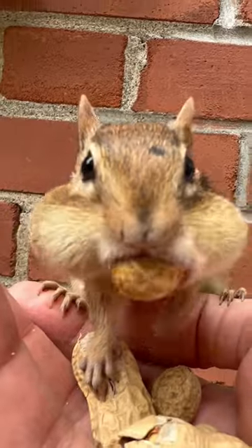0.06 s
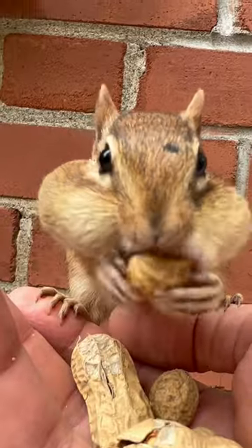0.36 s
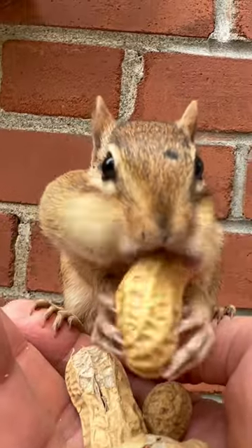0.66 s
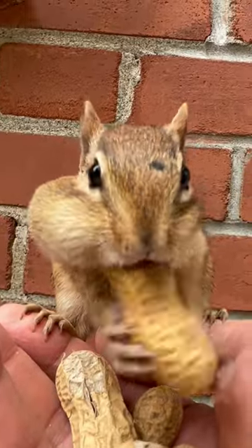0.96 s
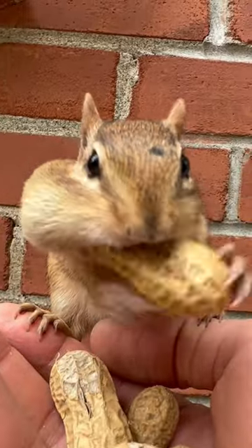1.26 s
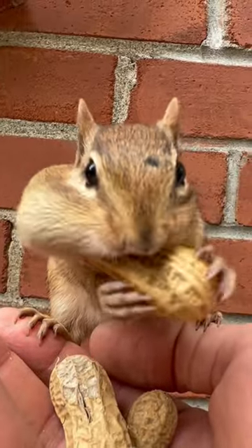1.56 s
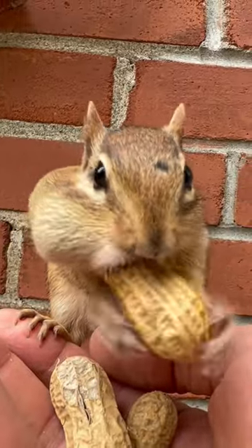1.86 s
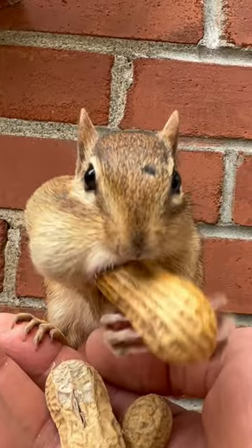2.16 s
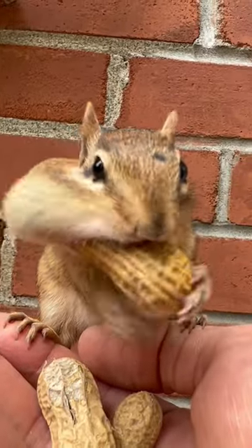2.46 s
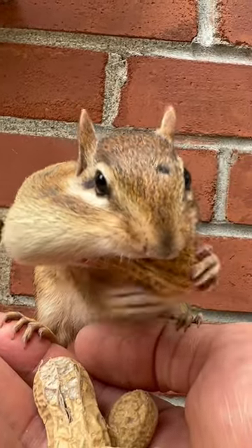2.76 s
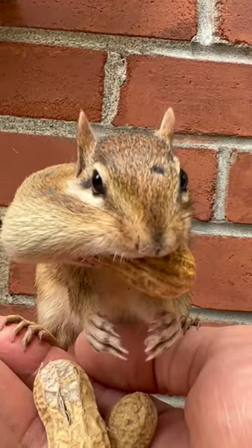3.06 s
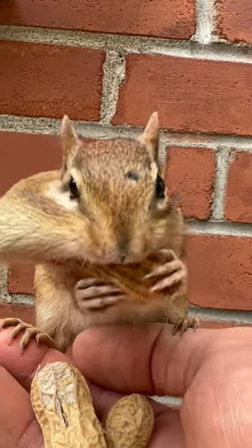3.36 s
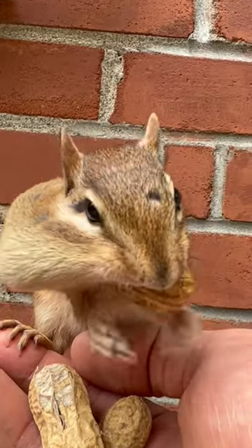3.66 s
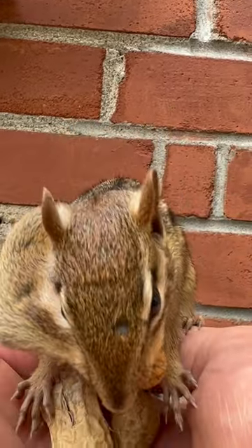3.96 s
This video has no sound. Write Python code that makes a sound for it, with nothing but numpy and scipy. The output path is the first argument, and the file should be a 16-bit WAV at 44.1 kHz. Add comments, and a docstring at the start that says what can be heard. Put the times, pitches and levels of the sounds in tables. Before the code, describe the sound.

A peanut shell ticks, crackles and scrapes softly up close in a chipmunk's teeth and paws, busy until about 2.7 seconds, then sparser. Soft bumps come near 1 and 1.7 seconds, and a hollow tap at 3.9. A bird's short, high chirps ring out louder at the start, 1.2 and 3 seconds, with fainter ones far off. Faint distant traffic and a low outdoor rumble continue underneath.

```python
"""A chipmunk on an open hand turns a peanut and works it into its cheek, close up, before a brick wall.
Teeth and claws tick on the dry hollow shell, paws and fur scrape over it in quick strokes, and the
nut or a paw bumps softly on the hand. A bird's three short high chips ring around the yard (the
first just before the start), with fainter ones far off. Under it all lie a wash of distant traffic
and a low outdoor rumble."""
import sys
import numpy as np
from scipy import signal
from scipy.fft import rfft, irfft
from scipy.io import wavfile

SR = 44100
rng = np.random.default_rng(int(sys.argv[2]) if len(sys.argv) > 2 else 0)


def bounce(signal):
    """Save signal as a 16-bit WAV file at the path given by the first command-line argument."""
    frames = np.transpose(np.atleast_2d(signal))
    limited = np.clip(frames, -1, 1)
    pcm = np.round(limited * 32767).astype(np.int16)
    wavfile.write(sys.argv[1], SR, pcm)


N = 176400
TIME = np.arange(N) / SR

# The nut has four layers, low to high: hollow body, crunch, dry crack, top fizz.
# Tooth and claw ticks, before trim: start_s, crumble_s, pitch_hz, body_db, crunch_db, crack_db, fizz_db
SHELL_TICKS = [(0.0137, 0.0038, 1865, -56, -66, -79.5, -65),
               (0.0431, 0.0026, 2180, -68.5, -75.5, -60.5, -72.5),
               (0.061, 0.00113, 2390, -59.5, -65.5, -65.5, -72),
               (0.084, 0.00214, 2370, -56.5, -55.5, -48, -53.5),
               (0.3105, 0.00185, 2050, -60, -71, -74.5, -91.5),
               (0.4586, 0.0018, 1510, -79, -80, -73, -69.5),
               (0.4806, 0.00117, 1680, -73.5, -68, -65, -83.5),
               (0.5109, 0.00061, 1510, -67.5, -79, -69.5, -82.5),
               (0.6095, 0.00027, 1510, -87, -95.5, -64, -85.5),
               (0.633, 0.00255, 1460, -61, -71.5, -63, -73.5),
               (0.6793, 0.00053, 2260, -74, -66.5, -56.5, -68.5),
               (0.6836, 0.00098, 1740, -87, -80, -59, -58.5),
               (0.7231, 0.0035, 1420, -59.5, -81, -65.5, -74.5),
               (0.7369, 0.0028, 3100, -71.5, -65, -81, -78),
               (0.7845, 0.0013, 1580, -83.5, -83.5, -77.5, -67),
               (0.8558, 0.0021, 1940, -72, -72, -68.5, -59.5), (0.8588, 0.0051, 2140, -58.5, -88, -60, -76),
               (0.9417, 0.0024, 1510, -60, -76, -73.5, -83), (0.9536, 0.0037, 1706, -56.5, -73, -78, -77.5),
               (1.0151, 0.0007, 2080, -63, -89.5, -56.5, -77),
               (1.0177, 0.00305, 1623, -51, -67.5, -64, -70),
               (1.0344, 0.0057, 1860, -58.5, -75, -68.5, -70.5),
               (1.1015, 0.0026, 1850, -77, -69.5, -62.5, -70), (1.2308, 0.0037, 2100, -58, -66.5, -75, -75),
               (1.3146, 0.00099, 1510, -60, -72.5, -54, -62),
               (1.3197, 0.0025, 1580, -58, -79, -51.5, -51.5),
               (1.3264, 0.00047, 1640, -66.5, -78, -49.5, -62), (1.359, 0.004, 2310, -72.5, -78, -52, -59),
               (1.368, 0.00204, 1740, -65, -66, -56, -62.5),
               (1.4503, 0.0052, 1800, -81.5, -80.5, -57, -62.5),
               (1.4674, 0.00224, 1550, -63, -74.5, -57, -73),
               (1.4883, 0.00073, 1510, -77.5, -77.5, -64, -71.5),
               (1.5362, 0.00108, 1510, -84.5, -78, -53.5, -67),
               (1.5611, 0.00314, 1510, -78.5, -75.5, -57, -64),
               (1.6044, 0.00075, 1570, -59, -64, -53, -58.5), (1.6578, 0.0091, 1910, -68, -73, -57, -64.5),
               (1.6967, 0.0026, 1490, -60.5, -53, -57, -66.5),
               (1.7001, 0.0042, 1640, -58.5, -67, -62.5, -73), (1.7522, 0.0069, 1560, -60, -69, -69.5, -71),
               (1.8088, 0.0033, 1790, -69.5, -76.5, -61, -73.5),
               (1.8741, 0.0009, 2170, -63.5, -62, -55.5, -78), (1.9106, 0.0007, 1680, -64, -70, -53.5, -68),
               (1.9515, 0.0051, 2240, -79, -75, -67, -75.5), (2.0137, 0.0038, 1530, -62, -72.5, -88, -79),
               (2.212, 0.0067, 1730, -58, -63.5, -66.5, -75), (2.2328, 0.00104, 1510, -73.5, -73, -56, -77),
               (2.3003, 0.0026, 1680, -81.5, -83.5, -69, -68.5), (2.3105, 0.0102, 1590, -64, -80, -61, -67),
               (2.3703, 0.00073, 1960, -89, -77.5, -61, -62.5),
               (2.391, 0.0043, 1510, -79.5, -73, -62.5, -65),
               (2.4358, 0.0027, 1800, -61, -71.5, -79, -83.5),
               (2.6147, 0.0036, 1885, -60, -83.5, -76.5, -84.5),
               (2.715, 0.0044, 2250, -70, -67, -55.5, -64), (2.7225, 0.00116, 2070, -61, -66, -54.5, -69.5),
               (2.8834, 0.005, 1510, -62, -92, -89, -108),
               (3.2767, 0.0029, 1870, -63.5, -72.5, -76.5, -85.5),
               (3.4121, 0.0053, 1520, -68.5, -65.5, -61.5, -69.5),
               (3.4859, 0.0053, 1670, -63.5, -83, -78, -76.5),
               (3.5045, 0.0021, 2376, -54, -58, -45.5, -56.5)]
TICK_TRIM_DB = (0.85, 0.39, 1.255, 0.5)   # per layer
SNAP_SHARE, CRUMBLE_GRAINS_PER_S = 0.456, 8600   # snap's share of the force energy; fibres breaking after
# Scraping strokes, before trim: start_s, length_s, body_db, crunch_db, crack_db, fizz_db
STROKES = [(0, 0.1065, -66, -65.5, -65.5, -71), (0.162, 0.13, -69, -84, -72.5, -81.5),
           (0.297, 0.084, -70.5, -97, -75, -81.5), (0.379, 0.1745, -68.5, -78.5, -67.5, -80.5),
           (0.553, 0.0103, -65, -74, -70.5, -85), (0.595, 0.129, -71.5, -82.5, -70.5, -81),
           (0.679, 0.086, -73, -73.5, -67, -79), (0.772, 0.05, -66, -84, -68.5, -81),
           (0.831, 0.0355, -69.5, -76.5, -68.5, -86), (0.942, 0.0614, -66.5, -71, -64, -81.5),
           (0.999, 0.0707, -76.5, -79.5, -63.5, -81.5), (1.09, 0.116, -66, -75, -63, -76.5),
           (1.196, 0.0736, -68, -71.5, -64, -72.5), (1.301, 0.034, -61.5, -70, -62.5, -70.5),
           (1.351, 0.0334, -66, -74, -58.5, -69.5), (1.389, 0.0415, -80.5, -92, -73, -82.5),
           (1.447, 0.048, -73.5, -77, -64.5, -75), (1.553, 0.011, -76, -85.5, -73.5, -76),
           (1.588, 0.0243, -63.5, -70, -61.5, -73), (1.654, 0.0728, -63.5, -68.5, -69.5, -78.5),
           (1.746, 0.042, -65.5, -70.5, -67.5, -81.5), (1.792, 0.0334, -81, -70, -61, -72.5),
           (1.859, 0.047, -67.5, -72, -67.5, -82.5), (1.938, 0.0413, -73.5, -88, -69.5, -75.5),
           (1.999, 0.085, -76.5, -96, -68, -80.5), (2.143, 0.1032, -69, -74.5, -68, -72.5),
           (2.264, 0.093, -74.5, -79.5, -77.5, -81.5), (2.36, 0.0306, -85.5, -76.5, -70.5, -72.5),
           (2.419, 0.0404, -68.5, -76, -65.5, -80), (2.548, 0.118, -77, -80, -84, -90),
           (2.66, 0.0763, -69, -80, -70, -77.5), (2.712, 0.0436, -79.5, -75.5, -78.5, -83),
           (3.178, 0.0305, -72.5, -71, -72.5, -79.5), (3.271, 0.054, -72.5, -83, -79.5, -90.5),
           (3.399, 0.044, -67, -79.5, -73, -80), (3.46, 0.077, -71, -72.5, -67, -76.5),
           (3.819, 0.1047, -70, -79.5, -74.5, -93.5)]
STROKE_TRIM_DB = (-0.7, 0.15, -.5, 0)   # per layer
RUSTLE_DB, TURNING_ENDS_S = (-82, -85.5, -83, -97.5), 2.46   # per layer, while the nut is turned
STROKE_EDGE_S, STROKE_SWELL, SCRAPE_PITCH_HZ = .013, 0.524, 1998
SCRAPE_GRAINS_PER_S, STICK_SLIP_DB = 2800, 4
# Dull thumps of the nut or a paw on the hand: start_s, peak_db, pitch_hz
THUMPS = [(1.018, -46, 549), (1.019, -54.5, 250), (1.696, -45, 135.3), (1.701, -49, 292.6),
          (1.755, -44, 197.4), (1.822, -48.5, 110), (3.883, -46.5, 336.8)]
# Modes of the whole nut's hollow tock: pitch_hz, width_hz, gain_db
TOCK_MODES = [(2093, 378, -1), (2588, 205, 4), (4036, 550, -15.5), (9180, 1610, -21)]
TOCK_S, TOCK_PEAK_DB, THUMP_Q = 3.8826, -32.5, 5.85
# Modes of the hollow shell: pitch_ratio, width_hz, gain_db
SHELL_MODES = [(.55, 447.9, 1.5), (1.0, 427.4, 10.5), (1.3, 520, -2.5)]
# Mid crunch of breaking fibres: frequency_hz, gain_db
CRUNCH_COLOUR = [(1800, -28), (2800, -2), (3500, -2), (4150, 0), (4800, -4), (5600, -7), (7500, -25)]
# Dry crack layer of a tick: frequency_hz, gain_db
CRACK_COLOUR = [(3500, -30), (5200, -9), (6800, -3), (8200, -3), (10000, 2), (10800, -2), (11800, -15),
                (13500, -35)]
# Dry crack layer of a scrape: frequency_hz, gain_db
SCRAPE_COLOUR = [(3500, -30), (5200, -12), (6800, -6), (8200, -5), (9300, -1), (10200, 2), (10900, -2),
                 (11800, -15), (13500, -35)]
# Top fizz of breaking fibres: frequency_hz, gain_db
FIZZ_COLOUR = [(9500, -30), (11500, -4), (12500, -1), (13500, -1), (15200, 1), (15800, -2), (16400, -16)]
LAYER_LAG_S, NUT_REVERB_DB = (0, 0, .000021, .000015), -23   # left behind right, per layer; reverb send

# Bird chips, near and far: start_s, source_db, top_pitch_hz, direct_gain
CHIPS = [(-.027, -22, 7063, 0.7), (1.1915, -23, 7185, 0.73), (1.885, -45.5, 6912, 0.15),
         (2.9959, -22.5, 7164, 0.97), (3.661, -67.5, 6620, .1)]
CHIP_START_HZ, CHIP_RISE_S, CHIP_PEAK_S, CHIP_LENGTH_S = 5044, .014, .0098, 0.0171
CHIP_OCTAVE_DB, FLUTTER_HZ, FLUTTER_DEPTH, CHIP_LAG_S = -26.5, 268.5, 0.3, .000028
# Slaps off the walls: delay_s, gain_db
WALL_ECHOES = [(.0083, -9), (0.0149, -11), (0.0228, -23.5)]
EARLY_T60_S, EARLY_DB, TAIL_T60_S, TAIL_DB = 0.1314, -1.5, 0.5126, -4.5

# Colour of the distant traffic wash: frequency_hz, gain_db
TRAFFIC_COLOUR = [(15, -61.5), (25, -32), (59, 1.5), (87, -3), (141, -4.5), (306, -14.5), (391, -15),
                  (466, -17.5), (569, -14.5), (636, -13), (777, -12), (1060, -16.5), (1320, -20.5),
                  (2060, -33), (2300, -38), (5000, -55), (6500, -95), (11000, -120)][:-2]
# Colour of the faint hiss above it: frequency_hz, gain_db
HISS_COLOUR = [(5000, -51.5), (7000, -48), (10400, -54.5), (12000, -75.5), (16000, -68)]
# How alike left and right are in wash and hiss: frequency_hz, correlation
STEREO_LIKENESS = [(60, 0.994), (130, 1), (290, 0.87), (640, 0.25), (1400, 0.434), (2400, .8), (3100, 0.93),
                   (6800, .2), (15000, .1)]
# Fader ride of the low rumble: time_s, level_db
RUMBLE_RIDE = [(0, -60), (1.2, -56.5), (2.3, -55), (2.7, -63), (3.1, -59), (4, -58.5)]
# Fader ride of the deepest rumble: time_s, level_db
SUB_RIDE = [(0, -51.5), (.45, -54), (.8, -61), (2.2, -62), (2.8, -61), (4, -67)]
WASH_DB, RUMBLE_HZ, RUMBLE_WIDTH_HZ, SUB_HZ, SUB_WIDTH_HZ = -53, 72.13, 22, 36.5, 28
CUTOFF_HZ = 16600


def chipmunk():
    """All handling of the peanut, close up, with a touch of the yard."""
    layers = shell_ticks() + scrapes()
    layers[0] += knocks()   # into the body layer
    direct = sum(delay_left(layer, lag_s) for layer, lag_s in zip(layers, LAYER_LAG_S))
    return direct + from_db(NUT_REVERB_DB) * yard_reverb(layers.sum(axis=0), EARLY_T60_S)


def shell_ticks(size=2048):
    """A tooth or claw meets the shell: one snap, then a brief crumble of fibres."""
    layers = np.zeros((4, N))
    t = np.arange(size) / SR
    level_scale = np.sqrt(.01 * SR)   # levels count over ten milliseconds
    for start_s, crumble_s, pitch_hz, *levels in SHELL_TICKS:
        crumble = grains(CRUMBLE_GRAINS_PER_S, size) * np.exp(-t / crumble_s)
        force = np.sqrt(1 - SNAP_SHARE) * unit_energy(crumble)
        force[0] += np.sqrt(SNAP_SHARE)
        responses = contact(pitch_hz, CRACK_COLOUR)
        for layer, response, db, trim_db in zip(layers, responses, levels, TICK_TRIM_DB):
            tick = unit_energy(through(force, response))
            add(layer, start_s, from_db(db + trim_db) * level_scale * tick)
    return layers


def scrapes(size=10000):
    """Paws and teeth stick and slip over the ridged shell: grainy strokes above a faint turning rustle."""
    friction = grains(SCRAPE_GRAINS_PER_S, N) * from_db(STICK_SLIP_DB * drift(rate_hz=160))
    turning = np.clip((TURNING_ENDS_S - TIME) / STROKE_EDGE_S, 0, 1)
    layers = np.zeros((4, N))
    for layer, response, db in zip(layers, contact(SCRAPE_PITCH_HZ, SCRAPE_COLOUR), RUSTLE_DB):
        layer += from_db(db) * turning * unit_rms(through(friction, response))
    t = np.arange(size) / SR - STROKE_EDGE_S / 2
    for start_s, length_s, *levels in STROKES:
        gate = np.clip(np.minimum(t, length_s - t) / STROKE_EDGE_S + .5, 0, 1)
        swell = 1 - STROKE_SWELL / 2 * np.cos(2 * np.pi * t / length_s)
        offset = rng.integers(N - size)
        force = gate * swell * friction[offset:offset + size]
        responses = contact(SCRAPE_PITCH_HZ, SCRAPE_COLOUR)
        for layer, response, db, trim_db in zip(layers, responses, levels, STROKE_TRIM_DB):
            stroke = np.sqrt(length_s * SR) * unit_energy(through(force, response))
            add(layer, start_s + t[0], from_db(db + trim_db) * stroke)
    return layers


def knocks(size=4096):
    """Soft, damped thumps on the hand and one hollow tock of the whole nut."""
    out, click = np.zeros(N), signal.unit_impulse(size)
    for start_s, db, hz in THUMPS:
        thump = resonate(resonate(click, hz, hz / THUMP_Q), hz, 2 * hz)
        add(out, start_s, from_db(db) * thump / np.abs(thump).max())
    tock = sum((-1) ** k * from_db(db) * resonate(resonate(click, hz, width_hz), hz, 4 * width_hz)
               for k, (hz, width_hz, db) in enumerate(TOCK_MODES))
    add(out, TOCK_S, from_db(TOCK_PEAK_DB) * tock / np.abs(tock).max())
    return out


def contact(pitch_hz, crack_colour):
    """The impulse responses of one spot on the shell: body, crunch, crack and fizz."""
    colours = (CRUNCH_COLOUR, crack_colour, FIZZ_COLOUR)
    return [shell_ring(pitch_hz)] + [fibre_click(colour) for colour in colours]


def shell_ring(pitch_hz, top_hz=3108, size=512):
    """The hollow shell's short ring: three damped modes with the treble rolled off."""
    click = signal.unit_impulse(size)
    ring = sum((-1) ** k * from_db(db) * resonate(click, pitch_hz * ratio, width_hz)
               for k, (ratio, width_hz, db) in enumerate(SHELL_MODES))
    return unit_energy(signal.sosfilt(signal.butter(3, top_hz, fs=SR, output="sos"), ring))


def fibre_click(colour, ripple_db=3.5, ripple_spacing_hz=586.5, size=512):
    """A fibre breaks: a click that every contact point colours with its own random peaks and dips."""
    hz = np.fft.rfftfreq(size, 1 / SR)
    ripple = np.interp(hz / ripple_spacing_hz, np.arange(size), rng.standard_normal(size))
    magnitude = from_db(at_hz(colour, hz) + ripple_db * ripple)
    cepstrum = irfft(np.log(magnitude))
    cepstrum[1:size // 2] *= 2   # fold to minimum phase for a hard attack
    cepstrum[size // 2 + 1:] = 0
    return unit_energy(irfft(np.exp(rfft(cepstrum))))


def grains(per_s, size, spread_db=4.0):
    """Grit: random clicks of uneven strength and sign."""
    strength = from_db(spread_db * np.minimum(rng.exponential(1, size), 5))
    return strength * rng.choice([-1, 1], size) * (rng.random(size) < per_s / SR)


def bird(preroll_s=1):
    """Each chip is one fast upward whistle, thrown back by the walls and ringing on in the yard."""
    t = np.arange(int(CHIP_LENGTH_S * SR)) / SR
    flutter = 1 + FLUTTER_DEPTH * np.cos(2 * np.pi * FLUTTER_HZ * (t - CHIP_PEAK_S))
    envelope = np.interp(t, [0, CHIP_PEAK_S, CHIP_LENGTH_S], [0, 1, 0]) ** 1.039
    envelope *= flutter / (1 + FLUTTER_DEPTH)
    rise = np.sin(np.pi / 2 * np.minimum(t / CHIP_RISE_S, 1))
    tail_send, direct = np.zeros((2, N + preroll_s * SR))
    for start_s, db, top_hz, direct_gain in CHIPS:
        hz = CHIP_START_HZ + (top_hz - CHIP_START_HZ) * rise
        phase = 2 * np.pi * np.cumsum(hz) / SR
        whistle = from_db(db) * envelope * np.sin(phase)
        octave = from_db(db + CHIP_OCTAVE_DB) * envelope * np.sin(2 * phase)
        add(tail_send, start_s + preroll_s, whistle)   # the overtone dies before the far walls
        add(direct, start_s + preroll_s, direct_gain * (whistle + octave))
    near = direct.copy()
    for delay_s, db in WALL_ECHOES:
        add(near, delay_s, from_db(db) * direct)
    early = from_db(EARLY_DB) * yard_reverb(direct, EARLY_T60_S)
    tail = from_db(TAIL_DB) * yard_reverb(tail_send, TAIL_T60_S)
    return (delay_left(near, CHIP_LAG_S) + early + tail)[:, preroll_s * SR:]


def yard_reverb(x, t60_s, build_s=0.016, size=30000):
    """Diffuse reflections build up and die away, different on each side."""
    t = np.arange(size) / SR
    envelope = from_db(-60 * t / t60_s) * np.clip(t / build_s, 0, 1) ** 2
    return np.array([through(x, unit_energy(envelope * noise)) for noise in rng.standard_normal((2, size))])


def traffic_wash():
    """Distant traffic, centred in the bass and wide in the mids, with a faint hiss on top."""
    hz = np.fft.rfftfreq(N, 1 / SR)
    likeness = np.where(hz < STEREO_LIKENESS[0][0], 1, at_hz(STEREO_LIKENESS, hz))
    colour_db = np.where(hz < HISS_COLOUR[0][0], at_hz(TRAFFIC_COLOUR, hz), at_hz(HISS_COLOUR, hz))
    spectra = rfft(rng.standard_normal((2, N))) * from_db(colour_db) * (hz > 20)
    mid, side = irfft(spectra * np.sqrt([1 + likeness, 1 - likeness]), N)
    return from_db(WASH_DB) * unit_rms(np.array([mid + side, mid - side]))


def rumble(hz, width_hz, ride):
    """Outdoor rumble: a narrow band of low noise that slowly swells and sinks."""
    band = resonate(resonate(rng.standard_normal(N), hz, width_hz), hz, 2 * width_hz)
    return from_db(np.interp(TIME, *np.transpose(ride))) * unit_rms(band)


def from_db(db):
    return 10 ** (np.asarray(db) / 20)


def unit_rms(x):
    return x / np.sqrt(np.mean(x ** 2) + 1e-20)


def unit_energy(x):
    return x / np.sqrt(np.sum(x ** 2) + 1e-20)


def at_hz(points, hz):
    """Read a curve along a log frequency axis."""
    point_hz, values = np.transpose(points)
    return np.interp(np.log(hz + 1), np.log(point_hz), values)


def add(out, start_s, sound):
    """Mix a sound in at a time, no earlier than zero."""
    i = max(int(start_s * SR), 0)
    part = sound[:max(len(out) - i, 0)]
    out[i:i + len(part)] += part


def through(x, response):
    return signal.fftconvolve(x, response)[:len(x)]


def resonate(x, hz, width_hz):
    """One ringing mode: a two-pole band-pass."""
    r = np.exp(-np.pi * width_hz / SR)
    feedback = [1, -2 * r * np.cos(2 * np.pi * hz / SR), r * r]
    return signal.lfilter(np.array([1, 0, -1]) * (1 - r * r) / 2, feedback, x)


def drift(rate_hz):
    """A random wander around zero, spread about 1."""
    return np.interp(TIME * rate_hz, np.arange(N), rng.standard_normal(N))


def delay_left(x, lag_s):
    """Mono to stereo, arriving a little later on the left."""
    hz = np.fft.rfftfreq(len(x), 1 / SR)
    left = irfft(rfft(x) * np.exp(-2j * np.pi * hz * lag_s), len(x))
    return np.array([left, x])


def scene():
    """Chipmunk up close, bird in the yard, traffic and rumble as the bed."""
    mix = chipmunk() + bird() + traffic_wash()
    return mix + rumble(RUMBLE_HZ, RUMBLE_WIDTH_HZ, RUMBLE_RIDE) + rumble(SUB_HZ, SUB_WIDTH_HZ, SUB_RIDE)


def record(dry):
    """A steep low-pass takes off the very top."""
    return signal.sosfilt(signal.ellip(10, .2, 80, CUTOFF_HZ, fs=SR, output="sos"), dry)


dry = scene()
out = record(dry)
bounce(out)
```